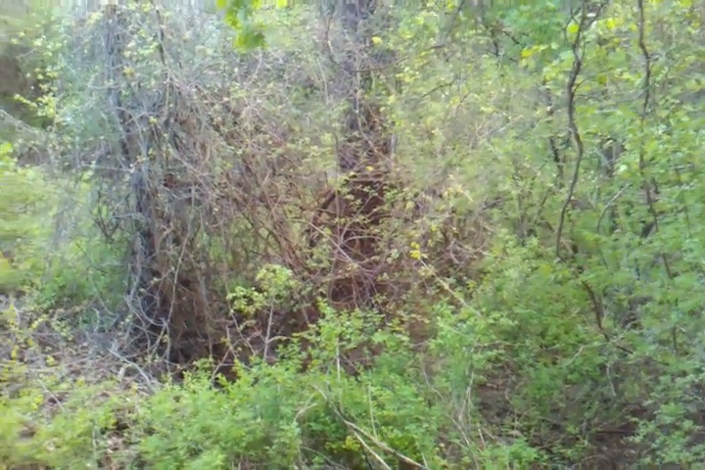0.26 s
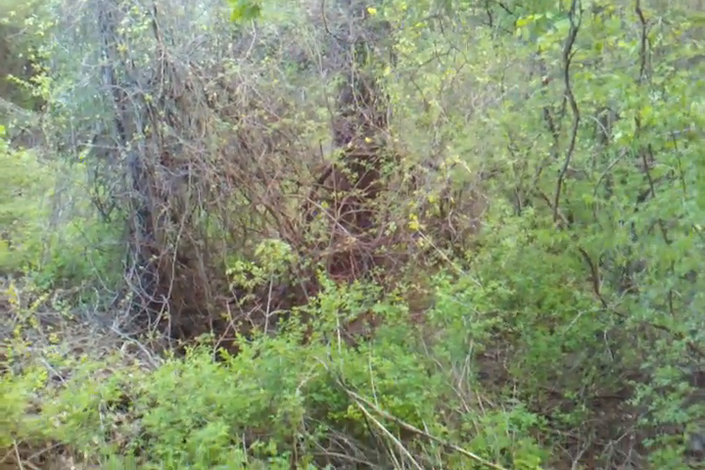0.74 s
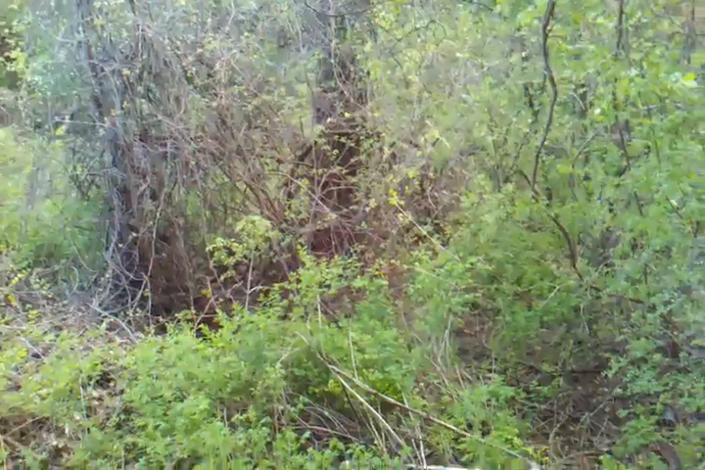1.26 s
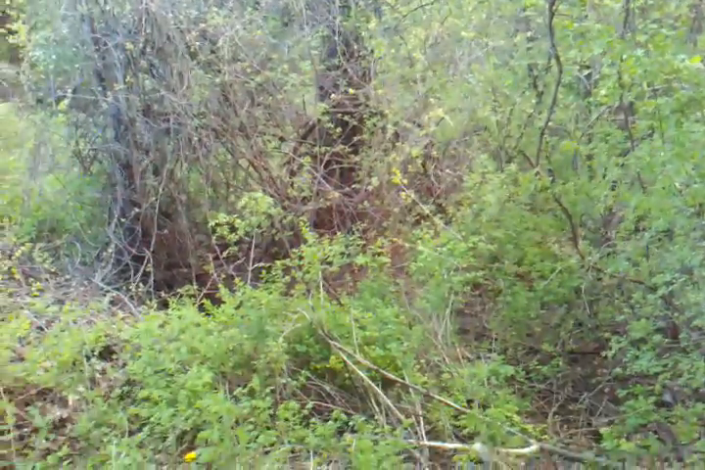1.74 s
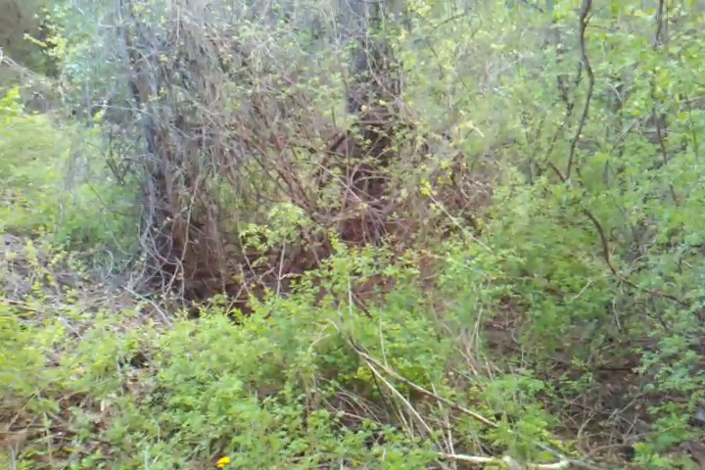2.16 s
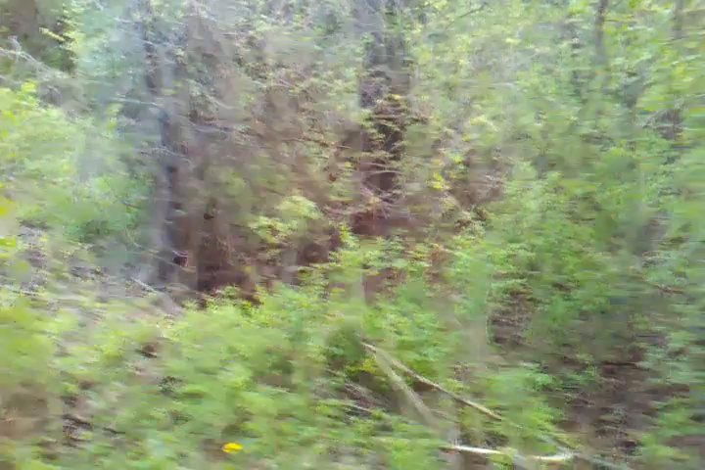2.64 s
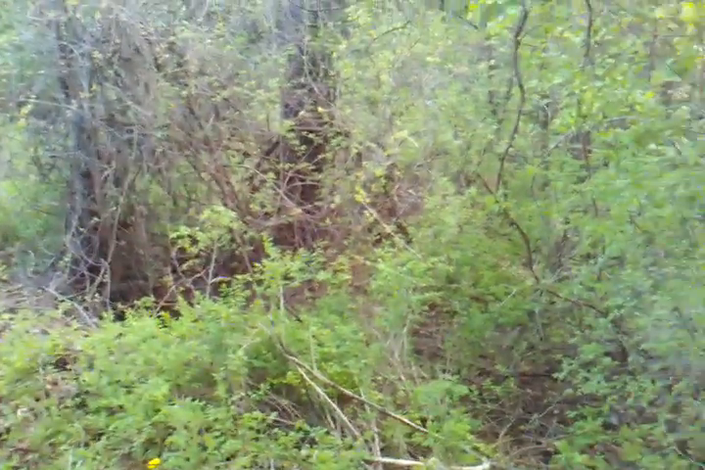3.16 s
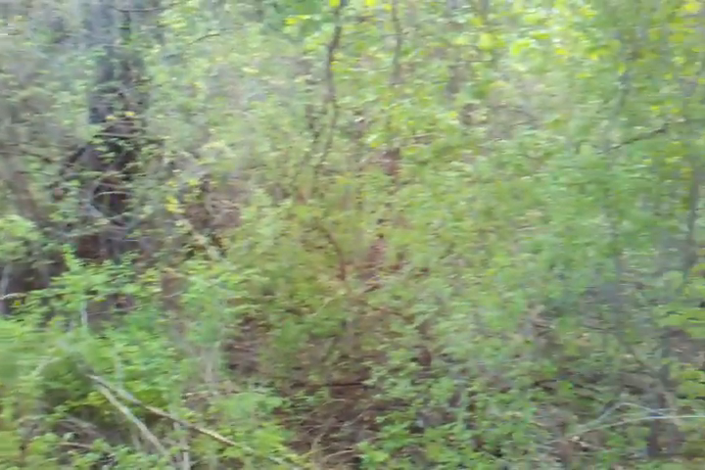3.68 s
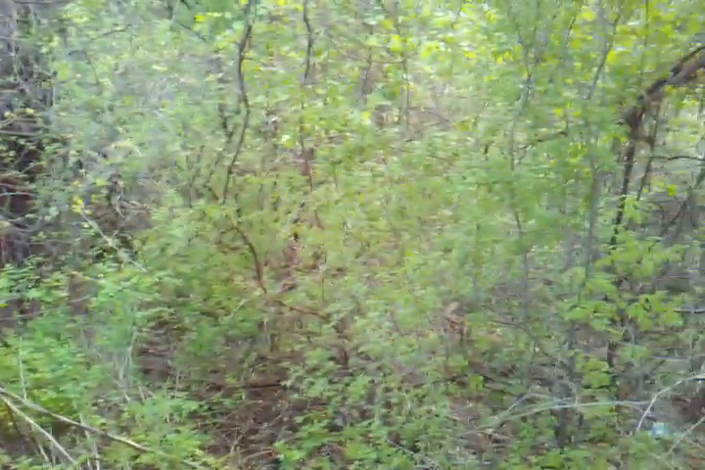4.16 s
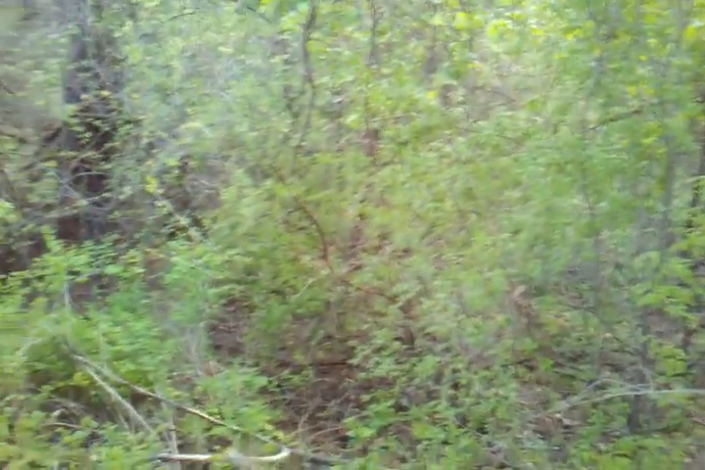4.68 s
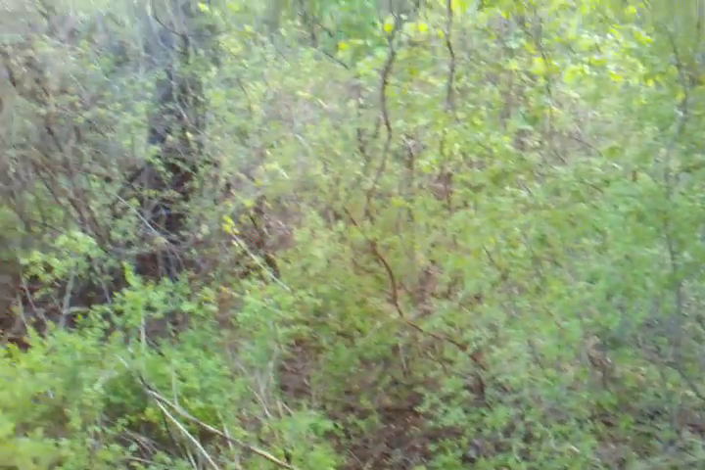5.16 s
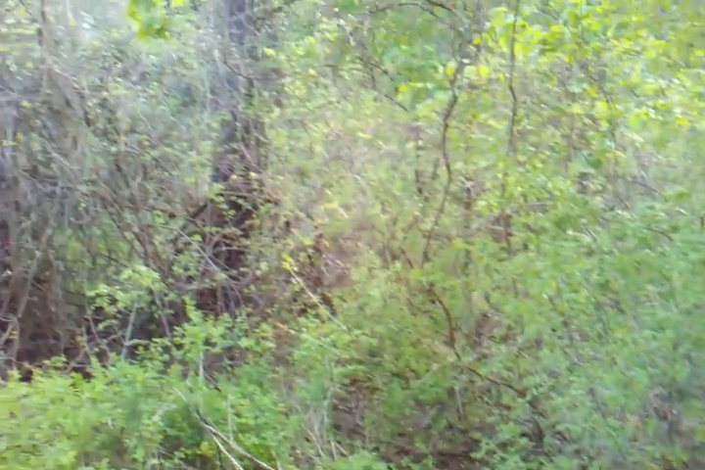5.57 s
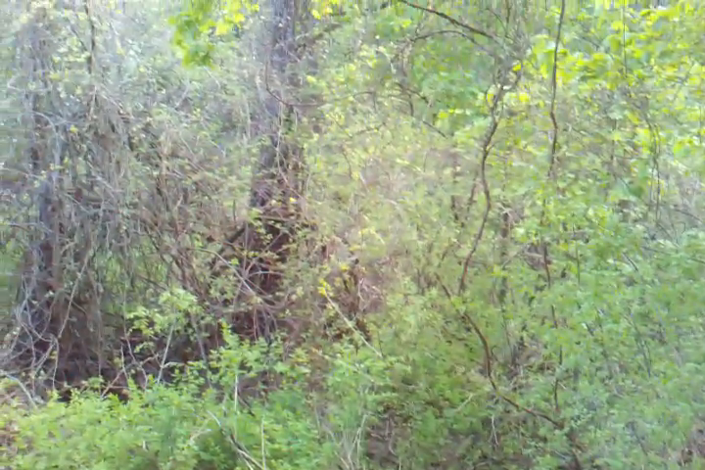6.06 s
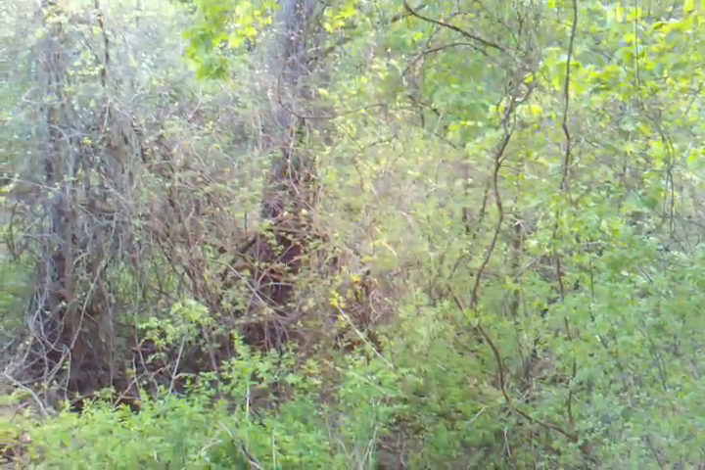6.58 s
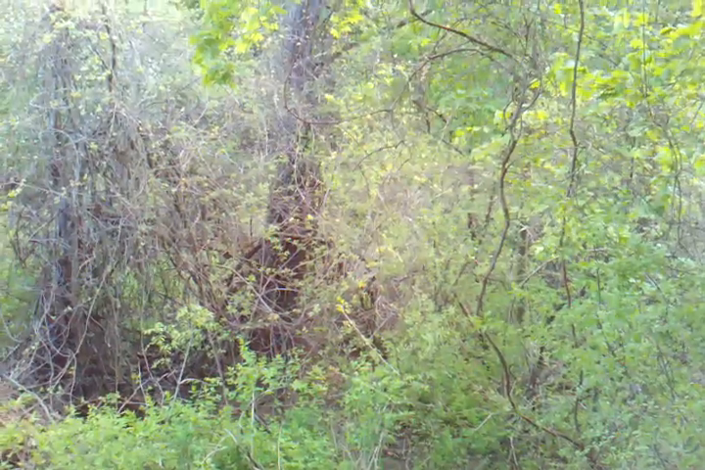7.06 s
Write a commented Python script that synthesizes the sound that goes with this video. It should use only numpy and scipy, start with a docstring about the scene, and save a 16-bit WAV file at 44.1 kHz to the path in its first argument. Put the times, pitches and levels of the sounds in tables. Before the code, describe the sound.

A fox's harsh scream is cut in at the start and rings through woods; soft rustling and snaps follow, then a second scream.

```python
"""Woods near a road: a fox screams twice from a thicket, the first scream already under way at the start.
Far off a crow caws three times, a small bird pips and an engine pulls up through two gears over the road's murmur.
Between the screams something brushes softly close to the microphones and a few dry snaps sound.
The calls are noise, slaps and harmonics shaped by throat resonances; the trees scatter and prolong them.
In the stereo picture the middle is hollow near 3 kHz, and the sides are hollow near 1.5 and 4.5 kHz."""
import sys
import numpy as np
from scipy import signal
from scipy.fft import rfft, irfft, next_fast_len
from scipy.io import wavfile
from scipy.ndimage import uniform_filter1d

SR = 44100
rng = np.random.default_rng(int(sys.argv[2]) if len(sys.argv) > 2 else 0)


def transcribe(signal):
    """Save signal, clipped to [-1, 1], as a 16-bit WAV file at the path in sys.argv[1]."""
    frames = np.atleast_2d(signal).T
    limited = np.clip(frames, -1, 1)
    pcm = np.round(limited * 32767).astype(np.int16)
    wavfile.write(sys.argv[1], SR, pcm)


N = 322750
TIME = np.arange(N) / SR  # s


def from_db(db):
    """Decibels to gain."""
    return 10 ** (np.asarray(db) / 20)


def rms_one(x):
    """Scale to unit power."""
    return x / np.sqrt(np.mean(x ** 2) + 1e-20)


def in_time(rows):
    """Times of the span of a curve table, then each column joined by straight lines."""
    s, *columns = np.transpose(rows)
    t = np.arange(round(s[0] * SR), round(s[-1] * SR)) / SR
    return [t] + [np.interp(t, s, c) for c in columns]


def add(track, start, sound):
    """Mix a sound into a track from its start time."""
    i = max(0, round(start * SR))
    track[..., i:i + sound.shape[-1]] += sound[..., :track.shape[-1] - i]


def colour(x, points):
    """Shape a sound by a smooth (frequency [Hz], gain [dB]) spectrum."""
    hz, db = np.transpose(points)
    size = next_fast_len(x.shape[-1])
    f = np.maximum(np.arange(size // 2 + 1) * SR / size, 1)
    gain = from_db(np.interp(np.log(f), np.log(hz), db))
    return irfft(rfft(x, size) * gain, size)[..., :x.shape[-1]]


def stereo_noise(spectrum, width):
    """Coloured noise in two channels, with unit power in the middle."""
    mid, side = colour(rng.standard_normal((2, N)), spectrum)
    return (mid + colour(side, width) * [[1], [-1]]) / np.std(mid)


def drift(rate, size):
    """Smooth chance of spread 1 that changes at about the given rate in Hz."""
    r = np.exp(-2 * np.pi * rate / SR)
    wander = signal.lfilter([1], [1, -2 * r, r * r], rng.standard_normal(N))
    return rms_one(wander)[N - size:]


def resonance(x, hz, width_hz):
    """A steep-sided resonance whose centre may move; gain 1 on top."""
    turn = np.exp(2j * np.pi * np.cumsum(hz * np.ones(len(x))) / SR)
    lowpass = signal.butter(2, width_hz / 2, fs=SR, output="sos")
    return 2 * np.real(turn * signal.sosfilt(lowpass, x / turn))


def steady(x):
    """Even out the slow level of a sound to 1."""
    return x / np.sqrt(uniform_filter1d(x ** 2, size=900) + 1e-12)


def envelope_db(age, attack_s, hold_s, release_s):
    """Attack, hold and release as straight lines in dB, 0 on top."""
    depth_db = 34  # an attack climbs this far; a release falls this far in its stated time
    before = np.maximum(1 - age / attack_s, 0)
    after = np.maximum(age - attack_s - hold_s, 0) / release_s
    return -depth_db * np.minimum(before + after, 6)


# spectrum of the road's murmur: (frequency [Hz], density [dB per Hz])
ROAD = [(15, -58), (25, -43), (70, -16), (83, -10.5), (123, 1.5), (158, -3.5), (204, -3), (345, -4.5),
        (380, -5.5), (707, -8), (826, -9.5), (1170, -12.5), (1420, -14), (2600, -26.5), (3380, -116),
        (5720, -120)]
# road balance: (frequency [Hz], left minus right [dB])
ROAD_PAN = [(100, -1.4), (600, -3.5), (2300, 1)]
# spectrum of the microphone hiss: (frequency [Hz], density [dB per Hz])
MIC_HISS = [(2000, -35), (2700, -10), (4000, -0.5), (5600, -5), (7200, 1.5), (8600, 1.5), (10000, -1),
            (11800, -8.5), (13800, -1)]
# width of road and hiss: (frequency [Hz], side minus mid [dB])
BACKGROUND_SIDE = [(30, 20), (65, 6), (130, 2.5), (300, 1), (600, -1.5), (1200, -9), (2300, 0),
                   (14000, 0.5)]


def background(road_db=-62.5, early_db=0.4, hiss_db=-69.5):
    """A distant road as low noise that slowly ebbs, louder on the right, and the microphones' own hiss."""
    ebb_db = np.interp(TIME, [2, 3.5], [early_db, 0]) + .5 * drift(0.33, N)
    road = from_db(road_db + ebb_db) * stereo_noise(ROAD, BACKGROUND_SIDE)
    # half of the balance goes to each channel
    left = colour(road[0], [(hz, db / 2) for hz, db in ROAD_PAN])
    right = colour(road[1], [(hz, -db / 2) for hz, db in ROAD_PAN])
    return np.array([left, right]) + from_db(hiss_db) * stereo_noise(MIC_HISS, BACKGROUND_SIDE)


# a far engine in two gears:
# (start [s], attack [s], hold [s], release [s], first pitch [Hz], pitch it strives for [Hz], level [dB])
GEARS = [(0.397, 0.64, 0.97, .4, 218.4, 363.7, -65), (1.65, 0.17, 0.33, 0.94, 204.7, 228.6, -65)]


def far_engine(waver_db=3.5, unsteady=.017, rev_up_s=0.94):
    """Only the firing note carries this far; in each gear it climbs ever more slowly toward its goal."""
    out = np.zeros((2, N))
    for start, attack, hold, release, first_hz, goal_hz, db in GEARS:
        age = TIME[TIME < attack + hold + release]
        hz = goal_hz + (first_hz - goal_hz) * np.exp(-age / rev_up_s)
        level_db = db + envelope_db(age, attack, hold, release)
        for channel in out:  # pitch and level waver separately in each channel
            phase = 2 * np.pi * np.cumsum(hz * (1 + unsteady * drift(19.4, len(age)))) / SR
            add(channel, start, from_db(level_db + waver_db * drift(24, len(age))) * np.sin(phase))
    return out


# width of the stirring and of the strokes: (frequency [Hz], side minus mid [dB])
FRONT_SIDE = [(300, 8), (700, -27), (1300, -47), (2300, 9.5), (4200, 5.5), (8000, -1), (14000, -0.5)]


def stirring(level_db=-74.5, grain_db=3):
    """A very faint rustle throughout: noise whose level flickers unevenly."""
    spectrum = [(1000, -3), (4000, 2.0), (5600, -38.0), (7500, 8.0), (14000, 7.0)]
    return from_db(level_db + grain_db * drift(50, N)) * stereo_noise(spectrum, FRONT_SIDE)


# thin pips of a small bird far off: (time [s], first pitch [Hz], level [dB])
PIPS = [(3.9, 8150, -69), (4.81, 8200, -71), (4.96, 8100, -75), (5.345, 8100, -72), (5.96, 8600, -67)]


def small_bird(pip_s=.045, fall_hz_per_s=3300):
    """Very high, slightly falling whistled tones that swell and fade."""
    out, age = np.zeros(N), TIME[TIME < pip_s]
    for start, first_hz, db in PIPS:
        hz = first_hz - fall_hz_per_s * age + 80 * drift(150, len(age))
        swell = np.sin(np.pi * age / pip_s)
        add(out, start, from_db(db) * swell * np.sin(2 * np.pi * np.cumsum(hz) / SR))
    return out


# caws: (start [s], length [s], top pitch [Hz], level [dB])
CAWS = [(0.641, 0.22, 678, -54), (1.32, 0.2, 675, -55.5), (1.999, 0.225, 660, -56)]
# arch of one caw: (share of its length, share of top pitch, level [dB], throat resonance [Hz])
CAW_SHAPE = [(0, .82, -13, 1330), (.13, .95, -6, 1350), (.29, 1, 0, 1370), (.47, .93, -5, 1400),
             (.62, .85, -8, 1640), (.8, .77, -6, 1580), (1, .69, -11, 1480)]


def crow(throat_width_hz=380, upper_db=-13, nasal_db=-27, third_db=-6,
         pitch_jitter=.045, breath_db=2.5, rattle_hz=70, rattle_depth=.7):
    """Hoarse, rattling arches; throat rises as pitch falls, so the third harmonic takes over from the second."""
    out = np.zeros(N)
    for start, length, top_hz, level_db in CAWS:
        t, arch, db, throat_hz = in_time([(start + share * length, *rest) for share, *rest in CAW_SHAPE])
        n = len(t)
        phase = 2 * np.pi * np.cumsum(top_hz * arch * (1 + pitch_jitter * drift(280, n))) / SR
        rattle_phase = 2 * np.pi * np.cumsum(rattle_hz * (1 + 0.12 * drift(41, n))) / SR
        rattle = 1 + rattle_depth * np.cos(rattle_phase)
        tone = np.cos(2 * phase) + from_db(third_db) * np.cos(3 * phase)
        buzz = rattle * (tone + from_db(breath_db) * rng.standard_normal(n))
        call = resonance(buzz, throat_hz, throat_width_hz)
        call += from_db(upper_db) * resonance(buzz, 1814, 250)
        call += from_db(nasal_db) * resonance(buzz, 3000, 1200)
        add(out, start, from_db(level_db + db) * steady(call))
    return out


# snaps: (time [s], strength [dB], own resonance [Hz], its width [Hz],
#         shared modes relative to own [dB], shared modes dull above [Hz])
SNAPS = [ (1.941, -10, 8300, 3010, -43, 12000), (1.991, -13, 8250, 3500, -31, 8000),
         (2.2892, -10.5, 7160, 980, -4.5, 16000), (2.671, -27.5, 2330, 920, 1, 2560),
         (3.031, -18.5, 4180, 1800, 0.5, 2400), (3.52, -23, 1860, 1500, -44, 4000),
         (3.741, -14.5, 4950, 2500, -25, 8200), (3.758, -18.5, 1670, 1560, -9.5, 2960),
         (4.153, -9.5, 4270, 950, -15.5, 6530), (4.2753, -21, 7840, 1500, -22, 9000)]
# modes that all snaps share: (frequency [Hz], width [Hz], level [dB])
SNAP_MODES = [(1580, 250, -4.5), (2150, 270, -8.5), (3890, 930, 2), (6460, 2900, 20), (9600, 680, 4.5),
              (13600, 2200, 8)]


def snaps(rise_s=0.0006, lag_s=0.000269, low_cut_hz=800):
    """A snap rings a damped resonance of its own and the shared modes, and reaches the left microphone first."""
    out = np.zeros((2, N))
    t = np.maximum(TIME[:SR // 40] - np.array([[0], [lag_s]]), 0)

    def ring(hz, width_hz):
        """A sine that dies away faster the wider its resonance."""
        return np.sin(2 * np.pi * hz * t) * np.exp(-np.pi * width_hz * t)

    for start, db, own_hz, own_width, shared_db, dull_hz in SNAPS:
        shared = 0
        for hz, width, mode_db in SNAP_MODES:
            shared = shared + from_db(mode_db) * ring(hz, width) / np.hypot(1, (hz / dull_hz) ** 4)
        snap = ring(own_hz, own_width) + from_db(shared_db) * shared
        add(out, start, from_db(db) * (1 - np.exp(-t / rise_s)) * snap)
    return signal.sosfilt(signal.butter(2, low_cut_hz, "high", fs=SR, output="sos"), out)


# brushing strokes, from light drags to firm sweeps:
# (start [s], attack [s], hold [s], release [s], hiss level [dB], body level [dB], ring level [dB])
STROKES = [ (1.73, 0.093, 0.71, 0.34, -73.5, -81, -77), (2.292, 0.056, 0.14, 0.038, -70.5, -72.5, -71),
           (2.553, 0.023, 0.0078, 0.051, -67, -64.5, -67), (2.878, 0.031, 0.58, 0.31, -68, -70.5, -72.5),
           (2.932, 0.031, 0.016, 0.12, -56.5, -75, -66), (3.007, 0.021, 0.019, 0.09, -55, -66, -71),
           (3.077, 0.021, 0.045, 0.092, -48.5, -57.5, -61.5), (3.2, 0.044, 0.045, 0.1, -53.5, -63, -56),
           (3.305, 0.034, 0.042, 0.13, -54, -61, -56), (3.604, 0.052, 0.0076, 0.41, -68, -66, -69),
           (4.03, 0.018, 0.068, 0.095, -48.5, -70.5, -64.5),
           (4.104, 0.035, 0.047, 0.045, -56.5, -69, -60.5), (4.165, 0.029, 0.018, 0.058, -54.5, -64.5, -60),
           (4.255, 0.018, 0.15, .12, -61, -72.5, -71.5), (4.295, 0.012, .003, 0.022, -57, -69, -58),
           (4.355, 0.07, 0.11, 0.16, -44.5, -59, -63), (5.231, 0.039, .005, 0.1, -63.5, -80, -70)]
# spectrum of a stroke's hiss: (frequency [Hz], density [dB per Hz])
STROKE_HISS = [(2000, -65), (5300, -14.5), (6300, -7.5), (7200, 0.5), (8000, -2), (8700, -7.5),
               (10400, -4.5), (11800, -12), (13000, -8.5), (14000, -21)]
# spectrum of a stroke's body: (frequency [Hz], density [dB per Hz])
STROKE_BODY = [(500, -31), (1000, -8), (1700, -1), (2250, -3.5), (2750, -21), (3600, -41), (5200, -21),
               (7000, -58)]


def brushing(grain_db=1.0, ring_hz=4300, ring_width_hz=1100):
    """Soft strokes of fine friction: a bright hiss over a duller body with one broad ring."""
    powers = np.zeros((3, N))  # strokes that overlap add in power
    for start, attack, hold, release, *levels_db in STROKES:
        age = TIME[TIME < attack + hold + 2 * release]
        course_db = np.array(levels_db)[:, None] + envelope_db(age, attack, hold, release)
        add(powers, start, from_db(course_db) ** 2)
    hiss, body, ring = np.sqrt(powers)
    ringing = rms_one(np.array([resonance(x, ring_hz, ring_width_hz) for x in rng.standard_normal((2, N))]))
    stroke = hiss * stereo_noise(STROKE_HISS, FRONT_SIDE) + body * stereo_noise(STROKE_BODY, FRONT_SIDE)
    return (stroke + ring * ringing) * from_db(grain_db * drift(120, N))


# distinct echoes from stands of trees: (delay [s], level [dB])
TREE_ECHOES = [(.115, -5), (.305, -7)]


def tree_echoes(x, db):
    """Stands of trees send a call back, late and dull."""
    out = np.zeros(len(x))
    dull = colour(x, [(1400, -3.5), (2500, -3), (8000, -16)])
    for delay, echo_db in TREE_ECHOES:
        add(out, delay, from_db(db + echo_db) * dull)
    return out


# flat spectrum: (frequency [Hz], density [dB per Hz])
WHITE = [(20, 0), (20000, 0)]
# width of the scattered calls: (frequency [Hz], side minus mid [dB])
CALL_SIDE = [(300, 12.5), (700, -3), (1150, -14), (1450, -13), (2250, 4), (3800, 0.5), (6000, 3.5),
             (14000, -12)]
# the lingering echo of the woods: (frequency [Hz], gain [dB])
WOODS_ECHO = [(500, -16), (960, 5), (1130, -3), (1230, 2.5), (1370, 1.5), (2000, 6.5), (4000, 11),
              (6000, 1), (8000, -5)]
# the direct call reaches the two microphones out of step: (frequency [Hz], side minus mid [dB])
DIRECT_SIDE = [(700, -23), (1200, -25), (1700, -54), (2250, -56), (2800, 0), (3600, -30), (6000, -1),
               (9000, -13)]


def woods(x, scatter_db, scatter_t60, echo_db, echo_t60, ring_db, trees_db,
          ring_hz=1185, ring_width_hz=200, ring_t60=1.35):
    """Direct call, quick scatter from nearby brush, distinct echoes, and a trunk tail thinning to a narrow ring."""
    def fade(noise, t60):
        """Let noise die away by 60 dB in t60 seconds, at unit energy per channel on average."""
        tail = noise * from_db(-60 * TIME / t60)
        return tail / np.sqrt(np.sum(tail ** 2) / 2)

    scatter = fade(stereo_noise(WHITE, CALL_SIDE), scatter_t60)
    scatter = colour(scatter, [(1500, 1), (2400, 15.5), (8000, 19.5)])
    trunks = stereo_noise(WHITE, CALL_SIDE) * (1 - np.exp(-TIME / 0.024))  # builds up over tens of ms
    echo = colour(fade(trunks, echo_t60), WOODS_ECHO)
    ring = np.array([resonance(channel, ring_hz, ring_width_hz) for channel in fade(trunks, ring_t60)])
    response = from_db(scatter_db) * scatter + from_db(echo_db) * echo + from_db(ring_db) * ring
    lingering = signal.fftconvolve(x[None], response[:, :2 * SR], axes=1)[:, :len(x)]
    direct = colour(x, [(1600, -1.0), (2350, 2.5), (4000, 9.5), (8000, -3.5)])
    # a quarter-cycle shift puts the side out of step with the middle
    shifted = signal.hilbert(direct, next_fast_len(len(x)))[:len(x)].imag
    side = colour(shifted, DIRECT_SIDE)
    # any lead before time zero is dropped
    return (direct + tree_echoes(x, trees_db) + side * [[1], [-1]] + lingering)[:, -N:]


# upper throat resonances of each scream: (frequency [Hz], width [Hz], level [dB])
EDGE_A = [(2074, 450, 2), (2820, 860, -2.5), (4100, 650, -7.5), (6030, 2400, -19), (7520, 580, -13)]
EDGE_B = [(2020, 1040, 5.5), (3380, 630, -0.5), (3830, 1170, 0.5), (5200, 1100, -22), (6200, 1400, -9),
          (7230, 1300, -15)]
# course of each scream: (time [s], pitch [Hz], second resonance [Hz], first resonance level [dB],
#   shrill fifth harmonic level [dB], second resonance level [dB], seventh harmonic level [dB],
#   ninth harmonic level [dB], edge level [dB])
SCREAM_A = [ (-.2, 243, 1600, -58, -32, -44, -54, -68, -51),
            (0, 251.1, 1570, -37, -36.5, -34, -52, -58, -43.5),
            (0.024, 251.9, 1470, -46, -41, -39, -53, -43, -43),
            (0.045, 246.8, 1490, -43, -38, -38.5, -47, -54, -45),
            (.075, 241.8, 1650, -53, -45, -43.5, -53, -63, -47.5),
            (.103, 238.2, 1730, -45, -46, -40, -34.5, -66, -53),
            (.13, 240.5, 1600, -47, -44, -38.5, -54, -65, -51),
            (.165, 242, 1560, -44, -42, -51, -67, -70, -58.5),
            (0.206, 237, 1680, -52, -40.5, -46, -59, -68, -60.5),
            (.245, 213.5, 1730, -51, -51, -61, -61, -80, -63.5),
            (.32, 181, 1600, -67, -68, -64, -69, -78, -70)]
SCREAM_B = [ (5.48, 175.7, 1650, -69, -70, -82, -81, -91, -94),
            (5.503, 182.2, 1680, -41, -38, -47.5, -68, -62, -76),
            (5.515, 188.4, 1680, -36, -29.5, -40, -66, -57, -65),
            (5.533, 212.4, 1720, -35, -33.5, -38, -53, -53, -58),
            (5.555, 230, 1670, -33, -43, -36, -44, -54, -53),
            (5.598, 228.1, 1620, -34, -42, -36, -29, -50, -51),
            (5.619, 228.3, 1640, -36.5, -41, -38, -37, -47, -50.5),
            (5.643, 234.9, 1580, -34.5, -41, -33.5, -34.5, -62, -51.5),
            (5.668, 227.3, 1810, -36, -49, -41, -34, -49, -50.5),
            (5.707, 233.1, 1740, -38, -43, -36.5, -42, -52, -53.5),
            (5.733, 239, 1660, -38, -34.5, -43, -49, -61, -55),
            (5.795, 235.5, 1700, -37.5, -34.5, -40, -48, -56, -58),
            (5.845, 224.3, 1623, -50, -33.5, -57, -56, -62, -58.5),
            (5.88, 195.8, 1632, -52.5, -50, -65, -62, -70, -64.5),
            (5.92, 178, 1600, -74, -64, -68, -66, -74, -61)]


def scream(course, edge_modes, first_width_hz, second_width_hz, octave_db, voiced_db, chest_db,
           chop_depth, dull_db_per_octave_s, jitter=.026, slap_spread_db=3.8):
    """Folds slap unevenly and chop the air to a rasp for the throat; single harmonics ring out of it by turns."""
    t, pitch, second_hz, first_db, shrill_db, second_db, seventh_db, ninth_db, edge_db = in_time(course)
    n = len(t)
    cycles = np.cumsum(pitch * (1 + jitter * drift(164.5, n))) / SR

    # one slap per cycle of the folds, over air noise that swells with each cycle
    slaps = np.diff(np.floor(cycles), prepend=0) * from_db(slap_spread_db * drift(230, n))
    chop = np.exp(chop_depth * np.cos(2 * np.pi * cycles))
    air = rms_one(rng.standard_normal((3, N))[:, :n] * chop)
    jet = air + from_db(voiced_db) * rms_one(slaps)

    # the first resonance follows the fifth harmonic
    first = steady(resonance(jet[0], 5 * pitch, first_width_hz))
    first += from_db(chest_db) * steady(resonance(jet[2], 830, 186))
    second = steady(resonance(jet[1], second_hz, second_width_hz))

    # the edge above 3800 Hz fades, against the rest of the edge, as a scream goes on
    edge = np.zeros(n)
    for k, (hz, width, db) in enumerate(edge_modes):
        dulling_db = dull_db_per_octave_s * max(np.log2(hz / 3800), 0) * (t - t.mean())
        edge += from_db(db - dulling_db) * resonance(jet[k % 3], hz, width)
    rasp = from_db(first_db) * first + from_db(second_db) * second + from_db(edge_db) * steady(edge)
    rasp *= rms_one(from_db(1.5 * drift(90, n)))  # uneven spurts

    def harmonic(order):
        """One harmonic of the folds, flickering on its own."""
        return np.sin(2 * np.pi * order * cycles) * np.sqrt(2) * from_db(2 * drift(70, n))

    ringing = from_db(shrill_db) * harmonic(5) + from_db(seventh_db) * harmonic(7)
    ringing += from_db(ninth_db) * (harmonic(9) + from_db(octave_db) * harmonic(18))
    small_mouth = signal.butter(8, 660, "high", fs=SR, output="sos")
    dying_away = np.minimum((t[-1] - t) / 0.048, 1)  # over the last 48 ms
    return signal.sosfilt(small_mouth, rasp + ringing) * dying_away


def scene():
    """The fox near, the birds far, small sounds at the microphones."""
    lead_s = .25  # the woods start ringing before time zero, as the first scream is already under way
    fox = np.zeros(N + round(lead_s * SR))
    first = scream(SCREAM_A, EDGE_A, first_width_hz=250, second_width_hz=350, octave_db=-5.5,
                   voiced_db=-8.0, chest_db=-8.5, chop_depth=.67, dull_db_per_octave_s=5)
    second = scream(SCREAM_B, EDGE_B, first_width_hz=330, second_width_hz=260, octave_db=-29,
                    voiced_db=-5.5, chest_db=-22.0, chop_depth=.45, dull_db_per_octave_s=61)
    add(fox, lead_s + SCREAM_A[0][0], first)
    add(fox, lead_s + SCREAM_B[0][0], second)
    calls = woods(fox, scatter_db=-8.5, scatter_t60=0.066, echo_db=-13, echo_t60=1.224,
                  ring_db=-13.5, trees_db=-20.5)
    calls += woods(crow(), scatter_db=-3, scatter_t60=0.15, echo_db=-4, echo_t60=.9,
                   ring_db=-20, trees_db=-7)
    return background() + far_engine() + stirring() + small_bird() + snaps() + brushing() + calls


# hollow band of the middle: from, to [Hz]
MID_HOLLOW = [2608, 3316]
# hollow bands of the sides: (from [Hz], to [Hz])
SIDE_HOLLOWS = [(1330, 1740), (4150, 4900)]


def record(dry):
    """Hollow out the middle near 3 kHz and the sides near 1.5 and 4.5 kHz; nothing sounds above 14 kHz."""
    def hollow(x, edges, order):
        """Cut out one band."""
        return signal.sosfilt(signal.butter(order, edges, "bandstop", fs=SR, output="sos"), x)

    mid = hollow((dry[0] + dry[1]) / 2, MID_HOLLOW, order=3)
    side = (dry[0] - dry[1]) / 2
    for edges in SIDE_HOLLOWS:
        side = hollow(side, edges, order=2)
    top = signal.ellip(12, .1, 70, 14000, fs=SR, output="sos")
    return signal.sosfilt(top, np.array([mid + side, mid - side]))


dry = scene()
out = record(dry)
transcribe(out)
```